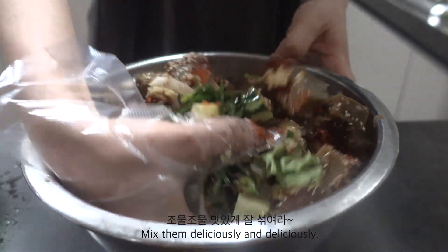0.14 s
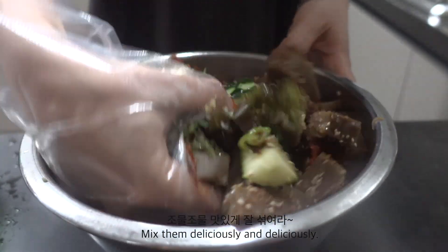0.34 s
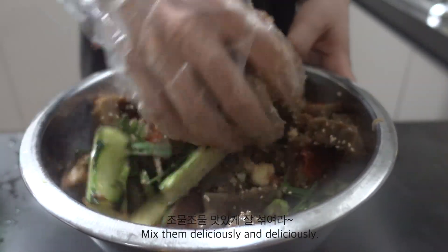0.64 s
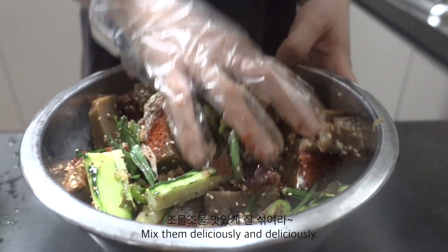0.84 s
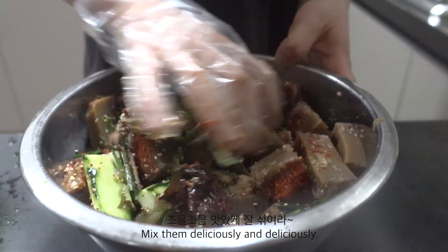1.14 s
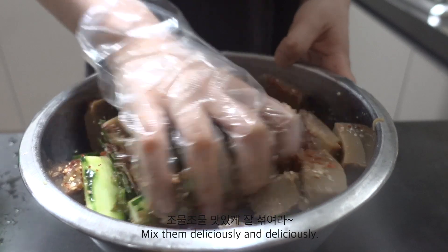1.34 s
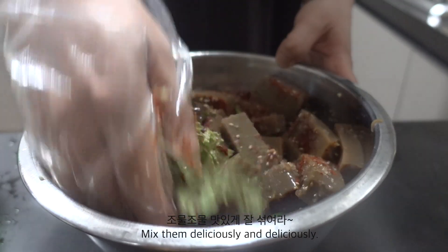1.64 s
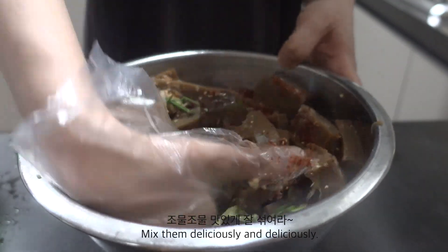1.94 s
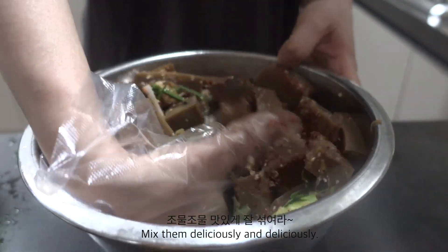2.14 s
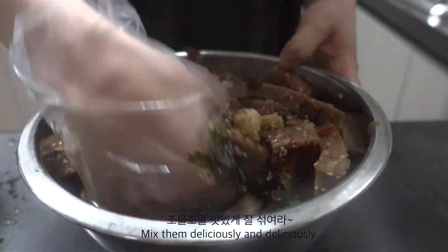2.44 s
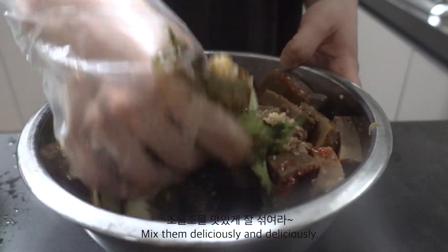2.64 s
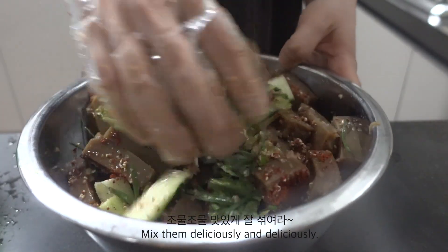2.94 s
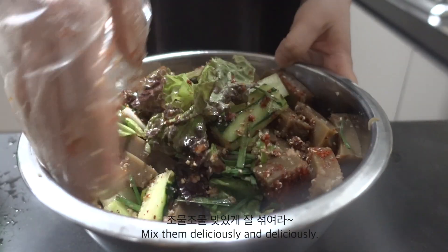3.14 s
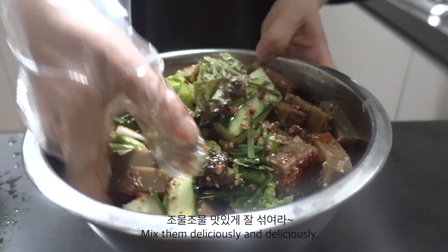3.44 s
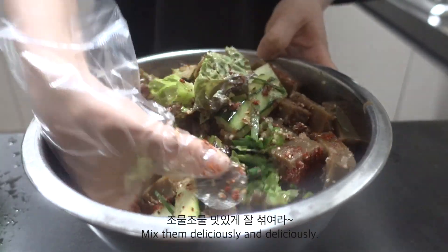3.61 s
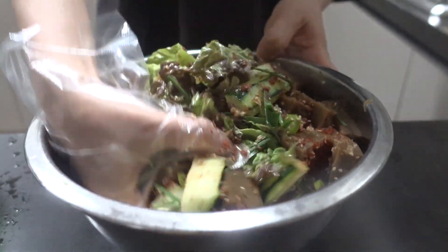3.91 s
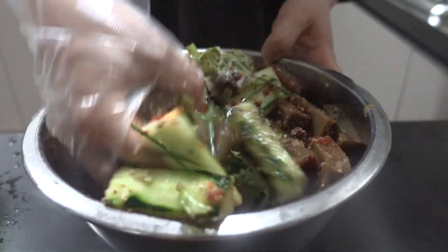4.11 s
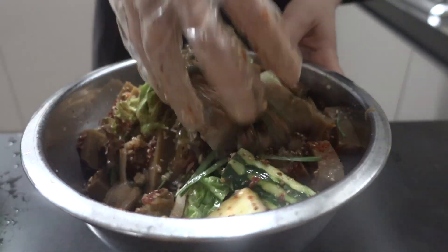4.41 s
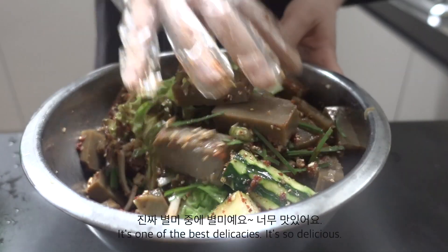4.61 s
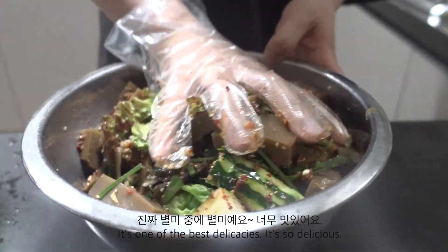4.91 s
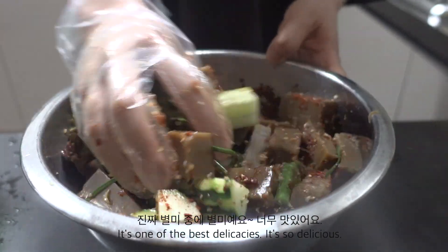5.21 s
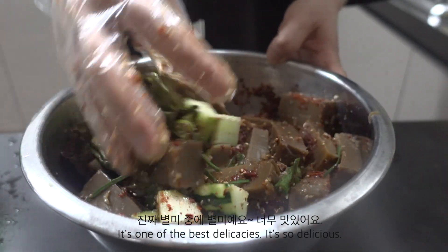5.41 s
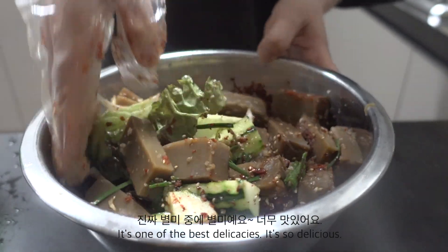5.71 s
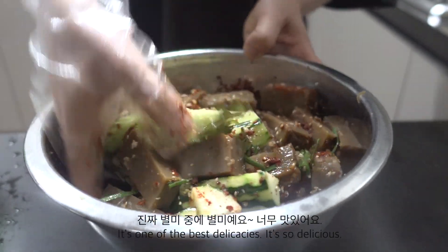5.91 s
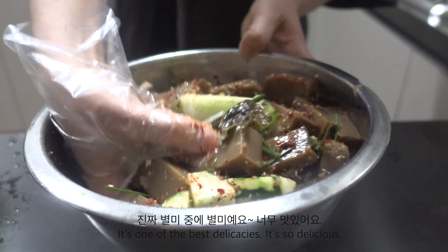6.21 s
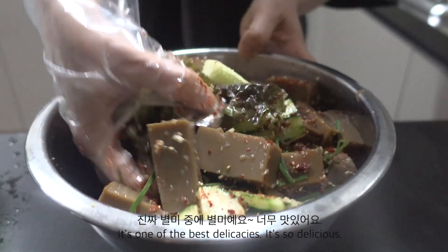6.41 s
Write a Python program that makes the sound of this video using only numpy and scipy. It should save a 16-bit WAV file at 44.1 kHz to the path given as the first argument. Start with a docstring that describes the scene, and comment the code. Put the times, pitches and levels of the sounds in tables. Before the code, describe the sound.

Close stereo microphone at a metal mixing bowl in a small kitchen. Bright plastic glove crackle leads, with moist squishes beneath and dull scraping along the steel wall. The hand dives, turns the food, squeezes and releases in uneven bursts, quieter just after four seconds. Then a wet slap with a short metallic ring, soft thuds, more ticks, and a final strong squeeze near six seconds. Short room echo, low steady background.

```python
"""In a small kitchen, close by, a gloved hand tosses a wet salad of jelly cubes and greens in a steel bowl.
Scoops, grips and shifting drive dense grains: crinkling film, squishing salad, food sliding on steel.
Over that bed, creases snap as ticks amid flurries, squelches are wet clicks ringing a gliding narrow gap,
and air pockets smack as short rings with spray. Jelly slaps as a splash with ringing steel partials, and
soft thuds mix a sine with band noise. Scattered echoes and a filtered-noise background place it in the room."""
import sys
import numpy as np
from scipy import signal
from scipy.fft import irfft
from scipy.io import wavfile
from scipy.ndimage import uniform_filter1d

SR = 44100
rng = np.random.default_rng(int(sys.argv[2]) if len(sys.argv) > 2 else 0)


def bounce(signal):
    """Save signal as a 16-bit WAV file at the path given by the first command-line argument."""
    frames = np.transpose(np.atleast_2d(signal))
    limited = np.clip(frames, -1, 1)
    pcm = np.round(limited * 32767).astype(np.int16)
    wavfile.write(sys.argv[1], SR, pcm)


N = 288855
TIME = np.arange(N) / SR


def amp(db):
    """Decibels to linear gain."""
    return 10 ** (np.asarray(db) / 20)


def evened(x):
    """Scales the whole signal to unit RMS."""
    return x / np.sqrt(np.mean(x ** 2) + 1e-20)


def steady(x, size=2600):
    """Levels the running strength to one over about 59 ms, keeping the fine grain."""
    power = abs(uniform_filter1d(x ** 2, size=size))
    return x / np.sqrt(power + 1e-4 * np.mean(x ** 2))


def read(points, hz):
    """Reads a spectrum joined by straight lines on a log-frequency axis."""
    f, value = np.transpose(points)
    return np.interp(np.log(hz + 1), np.log(f + 1), value)


def add(mix, s, sound):
    """Mixes a sound in at s seconds, cut off at the end of the mix."""
    part = mix[max(round(s * SR), 0):][:len(sound)]
    part += sound[:len(part)]


def colour(x, points, size=4096):
    """Minimum-phase filter with the given spectrum: causal, so clicks keep their sharp fronts."""
    log_gain = np.log(amp(read(points, abs(np.fft.fftfreq(size, 1 / SR)))))
    taps = np.fft.ifft(np.exp(np.conj(signal.hilbert(log_gain)))).real
    return signal.oaconvolve(x, taps[:size // 2])[:N]


def wander(per_s):
    """Smooth random curve of unit RMS with per_s new values a second."""
    return evened(np.interp(TIME * per_s, np.arange(N), rng.standard_normal(N)))


def ring(hz, cycles, size=700):
    """A short sine that swells to its peak after the given number of cycles, then dies away."""
    turns = hz * np.arange(size) / SR
    return np.sin(2 * np.pi * turns) * turns / cycles * np.exp(1 - turns / cycles)


def resonate(x, hz, width):
    """A resonance of gain 1 that follows the curve hz: shift down, low-pass, shift back up."""
    turn = np.exp(2j * np.pi * np.cumsum(hz) / SR)
    r = np.exp(-np.pi * width / SR)
    return 2 * (turn * signal.lfilter([1 - r], [1, -r], x / turn)).real


def tint(x, hz, db, width):
    """Lifts one moving band, then levels the result to unit strength."""
    return steady(x + amp(db) * resonate(x, hz, width))


# background of the kitchen: (frequency [Hz], relative level [dB])
KITCHEN_SPECTRUM = [(25, -26), (48, -12), (72, -11.5), (97, 0.5), (125, -6), (150, -6.5), (185, 8.5),
                    (230, -1.5), (320, -0.5), (550, -0.5), (900, -7), (3000, -23), (15000, -22)]
# how far the background spreads: (frequency [Hz], gain of the side noise [dB])
KITCHEN_SPREAD = [(40, -15), (150, -13), (280, -7.5), (550, -2.5), (1500, 9), (3000, 8), (15000, -9)]
KITCHEN_DB = -54.5


def kitchen():
    """Steady background from all round: two independent filtered noises, as (mid, side)."""
    common, apart = (amp(KITCHEN_DB) * evened(colour(rng.standard_normal(N), KITCHEN_SPECTRUM))
                     for _ in range(2))
    return common, colour(apart, KITCHEN_SPREAD)


def arch(start, length, peak, power):
    """Swells from nothing to 1 at the given share of its length, and sinks back."""
    share = np.interp(TIME, start + length * np.array([0, peak, 1]), [0, .5, 1])
    return abs(np.sin(np.pi * share)) ** power


# the hand dives down the wall and turns the salad over:
# (start [s], length [s], glove crinkling [dB], salad squishing [dB], sliding on the wall [dB])
SCOOPS = [(-.4, 0.78, -36.5, -37.5, -44.5), (1.562, 0.95, -33, -34.5, -43),
          (3.316, 0.88, -32, -38.5, -43.5), (4.606, 0.72, -33.5, -37.5, -41),
          (5.89, 0.64, -44, -39.5, -44.5)]
# share of a scoop at which each sound peaks: the film creases on the way in, the food yields, then it slides
CRINKLE_PEAK, SQUISH_PEAK, SLIDE_PEAK = 0.14, 0.35, 0.47
CRINKLE_POWER, SQUISH_POWER, SLIDE_POWER = 1.42, 1.03, 1.07  # higher = a narrower swell
# the fingers close on a handful or let it go: (start [s], length [s], crinkling [dB], squishing [dB])
GRIPS = [(0.143, 0.068, -35.5, -42.5), (0.218, 0.17, -37.5, -44), (0.588, 0.057, -35.5, -52),
         (0.721, 0.027, -32, -42), (0.816, 0.18, -30.5, -38), (1.181, 0.15, -32.5, -39.5),
         (1.338, 0.17, -35.5, -51), (1.635, 0.22, -30.5, -52), (2.266, 0.045, -35.5, -40),
         (2.292, 0.1, -36, -45), (2.6, 0.15, -44, -50.5), (2.874, 0.23, -39.5, -51.5),
         (3.17, 0.028, -32, -38), (3.203, 0.13, -39, -63), (3.434, 0.1, -31.5, -51),
         (3.71, 0.064, -31.5, -39), (4.169, 0.046, -40.5, -52), (4.294, 0.14, -39, -51),
         (4.68, 0.056, -33, -46), (5.032, 0.21, -35, -54), (5.583, 0.14, -37.5, -50),
         (5.7, 0.41, -37, -49.5), (5.914, 0.19, -31, -35), (5.95, 0.08, -28.5, -36),
         (6.253, 0.075, -36.5, -41.5)]
GRIP_PEAK, GRIP_POWER = 0.63, 0.32
GRIP_SLIDE_DB = -9  # against the squishing: a grip barely moves food along the wall
# the handful keeps shifting in the glove: (time [s], crinkling [dB])
SHIFTING = [(0, -42), (2.45, -42), (2.8, -46), (3.3, -43.5), (4.13, -54), (4.52, -48), (4.8, -40),
            (5.75, -46), (6.55, -43.5)]
SHIFT_SQUISH_DB, SHIFT_SLIDE_DB = -6, -13.5  # against the crinkling
SHIFT_FITS_DB, SHIFT_FITS_PER_S = 1.5, 40  # it shifts in fits and starts


def hand():
    """Strength of crinkling, squishing and sliding: scoops, grips and shifting add up in power."""
    shifting_db = np.interp(TIME, *np.transpose(SHIFTING)) + SHIFT_FITS_DB * wander(SHIFT_FITS_PER_S)
    crinkle, squish, slide = (amp(shifting_db + db) ** 2 for db in (0, SHIFT_SQUISH_DB, SHIFT_SLIDE_DB))
    for start, length, crinkle_db, squish_db, slide_db in SCOOPS:
        crinkle += (amp(crinkle_db) * arch(start, length, CRINKLE_PEAK, CRINKLE_POWER)) ** 2
        squish += (amp(squish_db) * arch(start, length, SQUISH_PEAK, SQUISH_POWER)) ** 2
        slide += (amp(slide_db) * arch(start, length, SLIDE_PEAK, SLIDE_POWER)) ** 2
    for start, length, crinkle_db, squish_db in GRIPS:
        grip = arch(start, length, GRIP_PEAK, GRIP_POWER)
        crinkle += (amp(crinkle_db) * grip) ** 2
        squish += (amp(squish_db) * grip) ** 2
        slide += (amp(squish_db + GRIP_SLIDE_DB) * grip) ** 2
    return np.sqrt([crinkle, squish, slide])


def depth(power=0.18):
    """How deep the hand is in the salad (0-1): a broad arch over each scoop."""
    return sum(arch(start, length, SLIDE_PEAK, power) for start, length, *_ in SCOOPS)


def buckling(per_s, spread_db, relax_s, count=900):
    """The film gives way in jerks: each sets off a burst that quickly dies."""
    size = amp(spread_db * np.minimum(rng.exponential(1, N), 3))
    jerks = size * (rng.random(N) < per_s / SR)
    return evened(signal.oaconvolve(jerks, np.exp(-np.arange(count) / SR / relax_s))[:N])


def crackle(per_s, spread_db, clump_db, clumps_per_s, low_hz, high_hz, cycles, kinship=0, count=24):
    """Tiny pops whose size swells in clumps; with kinship (0-1) neighbouring pops are alike in pitch."""
    spread = spread_db * np.minimum(rng.exponential(1, N), 3)
    clump = clump_db * np.clip(wander(clumps_per_s), -2, 2)
    clicks = amp(spread + clump) * rng.choice([-1, 1], N) * (rng.random(N) < per_s / SR)
    place = np.sqrt(kinship) * wander(clumps_per_s) + np.sqrt(1 - kinship) * rng.standard_normal(N)
    kind = np.floor(count * (1 + np.tanh(.85 * place)) / 2)  # which pitch each pop takes
    pops = np.zeros(N)
    for k, hz in enumerate(np.geomspace(low_hz, high_hz, count)):
        pops += signal.oaconvolve(clicks * (kind == k), hz * ring(hz, cycles))[:N]
    return steady(pops)


# resonances of the loaded bowl: (frequency [Hz], width [Hz], lift [dB])
BOWL_MODES = [(186.5, 13, 3), (500, 42, 0), (562, 19, 1.5), (826, 23, -9), (1130, 140, -5.5),
              (1900, 18, -10)]


def bowl(x):
    """The steel bowl, damped by its load, lifts a few narrow bands."""
    return x + sum(amp(db) * signal.lfilter(*signal.iirpeak(hz, hz / width, SR), x)
                   for hz, width, db in BOWL_MODES)


# colour of the plastic film: (frequency [Hz], filter gain [dB])
FILM_COLOUR = [(200, -44), (600, -1.5), (1500, -13.5), (2300, -6), (3200, -2), (4300, -0.5), (5600, -1),
               (7500, -4), (9500, -8.5), (12000, -16.5), (16000, -30)]
# colour of the wet salad, also of the squelches: (frequency [Hz], filter gain [dB])
WET_COLOUR = [(100, -34), (300, -5), (700, -9), (1000, -6.5), (1250, 1.5), (1800, 5), (2200, -3), (3000, 1),
              (5000, -5), (10000, -39)]
# colour of food sliding on the wall: (frequency [Hz], filter gain [dB])
WALL_COLOUR = [(40, -35), (80, -9), (170, -6), (280, -7.5), (430, -3), (550, -1.5), (850, 1.5), (1200, -1),
               (2500, -38), (6000, -65)]
# pitch of the hollow that rings under the cupped hand: (time [s], pitch [Hz])
HOLLOW = [(0.05, 830), (0.17, 510), (1.5, 530), (1.74, 780), (2.0, 814), (2.17, 706), (2.33, 800),
          (2.5, 535), (3.4, 557), (3.55, 830), (3.87, 786), (3.98, 514), (4.72, 550), (4.86, 800),
          (5.03, 547), (5.9, 644), (6.5, 600)]
HOLLOW_DB = 2
RASP_HZ = 1133  # wet film rubs on the food with a nasal rasp
RASP_DB, RASP_BURIED_DB = -2.5, -12  # its lift in the open, and the change when the hand is deep in the salad


def tossing(crinkle, squish, slide, pop_db=-40.0, burst_db=-7):
    """Crinkling film, squishing salad and food sliding on steel, each following the hand: (film, food)."""
    hollow_hz = np.interp(TIME, *np.transpose(HOLLOW))
    jerks = buckling(per_s=260, spread_db=1.0, relax_s=0.002)
    fizz = (1 + jerks) * crackle(per_s=4500, spread_db=0.0, clump_db=0.0, clumps_per_s=220,
                                 low_hz=1500, high_hz=16200, cycles=0.47, kinship=.2)
    pops = (1 + jerks) * crackle(per_s=260, spread_db=0.0, clump_db=2.5, clumps_per_s=110,
                                 low_hz=2610, high_hz=10700, cycles=0.59, kinship=.15)
    wet = (1 + jerks) * crackle(per_s=1600, spread_db=-0.3, clump_db=0.0, clumps_per_s=110,
                                low_hz=615, high_hz=5000, cycles=0.58)
    # tiny air pockets burst one by one in the dressing
    bursts = crackle(per_s=110, spread_db=1.5, clump_db=1.0, clumps_per_s=110,
                     low_hz=800, high_hz=2360, cycles=1.2)
    wall = (2 + jerks) * crackle(per_s=1400, spread_db=0.5, clump_db=4.5, clumps_per_s=19,
                                 low_hz=129.5, high_hz=2100, cycles=0.6)
    # separate pops stand out when the hand moves gently and drown in the fizz when it squeezes
    popping = amp(pop_db) * np.sqrt(crinkle / crinkle.mean())
    film = amp(0.4) * crinkle * steady(colour(fizz, FILM_COLOUR))
    film += popping * steady(colour(pops, FILM_COLOUR))
    rasp_db = RASP_DB + RASP_BURIED_DB * depth()
    dressing = tint(bowl(colour(wet, WET_COLOUR)), np.full(N, RASP_HZ), rasp_db, width=88)
    dressing += amp(burst_db) * bursts
    sliding = tint(bowl(colour(wall, WALL_COLOUR)), hollow_hz, HOLLOW_DB, width=63)
    food = amp(3.0) * squish * dressing + amp(0.5) * slide * sliding
    return film, food


# jelly that slaps flat against the steel: (time [s], gain [dB])
SLAPS = [(0.003, -28.5), (4.66, -22.5)]
# partials of the struck wall: (pitch [Hz], level within the slap [dB], t60 [s])
STEEL = [(398, -11, 0.068), (723, -10, 0.08), (1150, 1.5, 0.034), (2020, -9, 0.071)]


def slaps(splash_db=-7, splash_s=0.011, rise_s=0.00085, count=4400):
    """A wet face hits the wall: a soft noise splash and the short, damped ring of the steel."""
    out, t = np.zeros(N), np.arange(count) / SR
    steel = sum(amp(db - 60 * t / t60) * np.sin(2 * np.pi * hz * t) for hz, db, t60 in STEEL)
    contact = 1 - np.exp(-t / rise_s)
    splash_colour = [(120, -48), (350, -2), (1600, 12), (3000, 5), (10000, -10)]  # (Hz, dB)
    for s, db in SLAPS:
        spray = rng.standard_normal(count) * contact * np.exp(-t / splash_s)
        splash = colour(spray, splash_colour)[:count]
        add(out, s, amp(db) * (contact * steel + amp(splash_db) * splash))
    return out


# creases and wet films that snap at given times, strong and faint:
# (time [s], peak before colouring [dB], pitch [Hz], energy of the flurry against the tick [dB])
SNAPS = [(0.2322, -12.5, 6800, -5), (0.2624, -19, 3900, 1), (0.4367, -29, 4300, 5),
         (0.6185, -19.0, 4400, -3), (0.6575, -20, 4950, 8.5), (0.7009, -12, 5800, -16),
         (0.7067, -16, 6000, -9), (0.7146, -15, 4500, -8), (0.74, -11, 6100, -8), (0.7606, -12, 6300, -15),
         (0.7932, -11, 5900, 1), (0.8681, -10.9, 6100, 3.5), (0.8956, -14, 3170, 4.5),
         (0.909, -10.5, 5730, 0), (1.0897, -31, 5100, -12), (1.1284, -17.5, 4930, -2),
         (1.2061, -16, 6000, 1), (1.2223, -11.2, 6100, -3), (1.2946, -14, 3300, 1),
         (1.3798, -14.5, 3970, -4), (1.4591, -12, 4700, 5.5), (1.5383, -13, 4740, 0),
         (1.6004, -9, 4500, 3.5), (1.7678, -14.5, 5200, 3), (1.8625, -12.7, 3700, 3),
         (1.8834, -11, 4400, -1), (2.2774, -9, 4670, -1), (2.3482, -14.5, 4500, 5),
         (2.4487, -18.5, 4800, 3), (2.5316, -17, 5000, -9), (2.5898, -25, 4600, -4),
         (2.7069, -17.4, 6240, -2), (2.7356, -18, 5400, 2), (2.7924, -18, 4900, -4),
         (2.8708, -15.5, 4700, 3.5), (2.8981, -11.5, 5800, 2), (2.9545, -24, 5200, -9),
         (2.9737, -13, 6650, -9), (3.0556, -18.5, 5000, -1), (3.0929, -17, 6250, -7), (3.105, -19, 5700, 1),
         (3.26, -25, 5400, -7), (3.3125, -12.5, 5300, -2), (3.4576, -10.2, 6200, -2),
         (3.7622, -14, 4300, -8), (3.7928, -18, 5100, -10), (3.8104, -24, 4900, -16),
         (3.9574, -13.5, 4200, -2), (4.0477, -16, 4470, 1.5), (4.1893, -23.5, 3330, 5),
         (4.2677, -17.5, 8700, -14), (4.3672, -19, 6200, 1), (4.3868, -12.5, 4900, -12),
         (4.4637, -16, 6200, -14), (4.4912, -17.5, 5700, -2), (4.5485, -17.5, 5300, -13),
         (4.5694, -8.5, 6160, -17), (4.6043, -19.4, 4600, 8), (4.6123, -11.5, 6500, -3),
         (4.6368, -9.5, 5540, -1), (4.7402, -6, 4530, -16), (4.7848, -12, 5500, -8),
         (5.3426, -18.2, 5000, -7), (5.3495, -13, 5400, -15), (5.405, -17.5, 4600, -4),
         (5.4422, -17.5, 5300, -16), (5.4858, -18, 4700, -2), (5.5035, -12.5, 6000, -11),
         (5.5397, -12.5, 6500, -10), (5.5795, -14.5, 5360, -9), (5.6355, -16.5, 4800, 3),
         (5.6657, -15, 5300, -4), (5.9045, -12.8, 6600, -12), (5.9152, -13, 5340, 2.5),
         (5.9911, -6, 4500, -10), (6.4634, -15, 5200, -11)]
STRAYS_PER_S, STRAY_HZ, STRAY_FLURRY_DB = 18, 5000, -6  # further creases snap at random in between
STRAY_DB, STRAY_SPREAD_DB = -23.5, 5.5  # level at mean crinkling, and the most it strays either way
STRAY_FOLLOW = 0.75  # they grow by this many dB for each dB of crinkling


def creases(crinkle):
    """The timed snaps, plus strays at random times that grow with the crinkling; columns as SNAPS."""
    stray_db = STRAY_DB + STRAY_FOLLOW * 20 * np.log10(crinkle / crinkle.mean())
    strays = []
    for when, size, pitch in rng.random((round(STRAYS_PER_S * N / SR), 3)):
        db = stray_db[int(when * N)] + STRAY_SPREAD_DB * (2 * size - 1)
        strays.append((when * N / SR, db, STRAY_HZ * 2 ** (pitch - .5), STRAY_FLURRY_DB))
    return list(SNAPS) + strays


# colour of a snap: (frequency [Hz], filter gain [dB])
CREASE_COLOUR = [(200, -22), (1500, -8), (3500, -2.5), (9000, 2), (16000, 0)]


def snaps(crinkle, flurry_s=0.0038, flurry_per_s=2500, chain_db=-10, chain_s=0.011, count=1200):
    """A crease gives way with a sharp tick amid a flurry of smaller ones, and sets off two neighbours."""
    out = np.zeros(N)
    front = count // 3  # the tick's place in the snippet; part of the flurry comes before it
    t = (np.arange(count) - front) / SR
    swell = np.exp(np.where(t < 0, 1.5 * t, -t) / flurry_s)
    for s, db, hz, flurry_db in creases(crinkle):
        push = np.zeros(count)
        push[front] = 1
        # the film flutters, and the wall of the bowl throws the tick back at once
        echoes = front + rng.integers((8, 24, 40), (24, 40, 70))
        push[echoes] = rng.choice([-1, 1], 3) * np.array([.65, .5, .3])
        cycles = rng.uniform(.35, .6)
        tick = np.convolve(push, ring(hz, cycles))[:count] + .25 * push
        happens = rng.random((2, count)) < flurry_per_s / 2 / SR
        followers = swell * rng.uniform(-1.2, 1, (2, count)) * happens
        flurry = sum(np.convolve(row, ring(hz * step, cycles))[:count]
                     for row, step in zip(followers, (.75, 1.2)))
        snap = tick + amp(flurry_db) * tick.std() * evened(flurry)
        add(out, s + t[0], amp(db) * snap / abs(tick).max())
        for wait, size, pitch in rng.random((2, 3)):
            neighbour = size * ring(hz * 2 ** (pitch - .5), 2 * cycles)
            add(out, s + chain_s * wait, amp(db + chain_db) * neighbour)
    return colour(out, CREASE_COLOUR)


# dressing is forced through a gap that opens and closes again:
# (start [s], length [s], level [dB], first pitch [Hz], last pitch [Hz], width [Hz])
SQUELCHES = [(0.321, 0.064, -43, 520, 500, 45), (0.848, 0.16, -35, 1360, 1270, 520),
             (1.218, 0.27, -39, 1390, 1290, 280), (1.923, 0.2, -36, 830, 770, 55),
             (3.686, 0.18, -39.5, 795, 790, 50), (3.864, 0.034, -38, 1260, 1340, 280),
             (4.777, 0.039, -31, 1150, 1240, 200), (4.87, 0.072, -35, 840, 700, 141),
             (5.778, 0.21, -39.5, 1950, 1750, 500), (6.17, 0.074, -37, 1410, 1270, 260)]


def squelches(splutter_db=-5):
    """A run of wet clicks rings a narrow gap, whose pitch glides as the flow swells and sinks back."""
    out = np.zeros(N)
    wet = colour(crackle(per_s=1100, spread_db=0.5, clump_db=3.0, clumps_per_s=70,
                         low_hz=500, high_hz=3030, cycles=0.65), WET_COLOUR)
    for start, length, db, first_hz, last_hz, width in SQUELCHES:
        t = np.arange(0, length, 1 / SR)
        clicks = evened(wet[round(start * SR):][:len(t)])
        gap = evened(resonate(clicks, np.linspace(first_hz, last_hz, len(t)), width))
        flow = np.sqrt(abs(np.sin(np.pi * t / length)))
        add(out, start, amp(db) * flow * evened(gap + amp(splutter_db) * clicks))
    return out


# wet pockets that pop in the salad; few cycles = a smack, many = a bubble:
# (time [s], level before colouring [dB], pitch [Hz], time the ring takes to swell [cycles])
SMACKS = [(0.3352, -20, 1510, 2.2), (0.4358, -18.5, 1700, 1.5), (0.729, -23.5, 1500, 0.97),
          (0.89, -18, 1510, 1.5), (1.001, -20, 1300, 1.4), (1.294, -19.5, 1320, 1.7),
          (1.763, -15, 2350, 2.4), (2.1246, -23, 1280, 4), (3.896, -25, 1260, 2.8), (4.81, -26, 1720, 2),
          (4.8954, -18.5, 1700, 2.4), (5.403, -24.5, 1860, 2.6), (6.159, -22, 1900, 2),
          (6.295, -25.5, 603, 3.8)]


def smacks(spray=2.04, spray_s=0.0052, count=2400):
    """Pockets of air pop in the dressing: a ring in noisy spray; the more cycles it swells, the less spray."""
    out, fade = np.zeros(N), np.exp(-np.arange(count) / SR / spray_s)
    for s, db, hz, cycles in SMACKS:
        droplets = rng.standard_normal(count) * fade
        add(out, s, amp(db) * (ring(hz, cycles, size=count) + spray / cycles * droplets))
    smack_colour = [(40, -41), (300, -8), (800, -1.5), (2200, -1.5), (5000, 0), (16000, -18)]  # (Hz, dB)
    return amp(-3.5) * bowl(colour(out, smack_colour))


# food and knuckles that bump the bowl: (time [s], gain [dB], pitch [Hz], t60 [s])
THUDS = [(3.683, -39, 144, 0.14), (3.69, -51, 70, 0.25), (3.714, -36, 181, 0.15),
         (4.685, -29.5, 560, 0.072), (4.691, -49, 95, 0.2), (4.916, -35.5, 355, 0.087),
         (5.042, -36, 168.6, 0.21), (5.05, -50, 86, 0.3), (5.066, -40, 185, 0.15),
         (6.181, -39.5, 169, 0.18)]


def thuds(rise_s=0.00092, count=12000):
    """Soft bumps on the bowl: a dull decaying sine, and a tumble of band noise as the food settles."""
    out, t = np.zeros(N), np.arange(count) / SR
    for s, db, hz, t60 in THUDS:
        band = signal.butter(3, [hz / 2, 1.4 * hz], "bandpass", fs=SR, output="sos")
        settling = evened(signal.sosfilt(band, rng.standard_normal(count)))
        knock = 0.93 * np.sin(2 * np.pi * hz * t) + 0.47 * settling
        add(out, s, amp(db - 60 * t / t60) * (1 - np.exp(-t / rise_s)) * knock)
    return out


# how long the kitchen's echoes last: (frequency [Hz], t60 [s])
ROOM_DECAY = [(150, 0.37), (600, 0.48), (3000, 0.37), (8000, 0.37), (15000, 0.8)]


def room(x, delay_s=0.0047, turns_per_s=1.696, count=16000, order=4):
    """Scattered echoes of the kitchen, each band with its own decay; their pattern keeps shifting."""
    out = np.zeros(N)
    for k in range(order):
        sparse = rng.random(count) < .08
        taps = rng.standard_normal(count) * sparse * (np.arange(count) > delay_s * SR)
        hz, t, z = signal.stft(taps, SR, nperseg=256)
        tail = signal.istft(z * amp(-60 * t / read(ROOM_DECAY, hz)[:, None]), SR)[1]
        share = np.sqrt(2 / order) * np.cos(np.pi * (turns_per_s * TIME + k / order))
        out += signal.oaconvolve(x * share, tail / np.linalg.norm(tail))[:N]
    return out


def scattered(x, size=2048):
    """All-pass: every frequency arrives after its own small delay, at unchanged strength."""
    knots_s = rng.uniform(.0005, .006, size=200)
    delay_s = np.interp(np.arange(size + 1), np.linspace(0, size, num=200), knots_s)
    phase = np.pi * np.cumsum(delay_s) * SR / size
    return signal.oaconvolve(x, irfft(np.exp(-1j * phase)))[:N]


# level of a phase-scattered copy of the salad in the side signal: (frequency [Hz], side against mid [dB])
SCATTERED_SIDE = [(60, -29), (300, -23), (600, -14), (1100, -36), (2300, -65), (4500, -37), (8000, -29),
                  (13000, -19)]
# fast random flutter of the glove sound between left and right: (frequency [Hz], side against mid [dB])
GLOVE_FLUTTER = [(300, -23), (2000, -42), (4500, -21), (8000, -22.5), (13000, -12)]
FLUTTER_PER_S = 130


def spread(salad, glove):
    """Side signal: a phase-scattered copy of the salad, and glove sound under a fast random gain."""
    flutter = wander(FLUTTER_PER_S) * glove
    return colour(scattered(salad), SCATTERED_SIDE) + colour(flutter, GLOVE_FLUTTER)


def scene():
    """The bowl sits close in the middle, widened a little; the kitchen's background comes from all round."""
    kitchen_mid, kitchen_side = kitchen()
    crinkle, squish, slide = hand()
    film, food = tossing(crinkle, squish, slide)
    glove = film + snaps(crinkle)
    near = glove + food + slaps() + squelches() + smacks() + thuds()
    salad = near + amp(-7.0) * room(near)
    mid = salad + kitchen_mid
    side = spread(salad, glove) + kitchen_side
    return amp(-3.5) * np.array([mid + side, mid - side])


EDGE_HZ = 16000


def record(dry):
    """The microphone's low cut and the recorder's band limit."""
    low_cut = signal.butter(2, 50, "highpass", fs=SR, output="sos")
    thinned = signal.sosfilt(low_cut, dry)
    taps = signal.firwin(511, EDGE_HZ, window=("kaiser", 9), fs=SR)
    return signal.oaconvolve(thinned, taps[None], "same", axes=1)


dry = scene()
out = record(dry)
bounce(out)
```